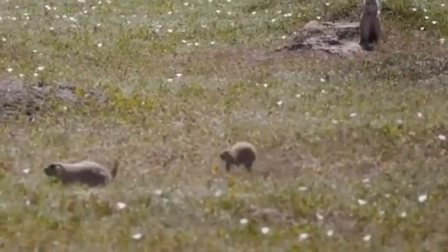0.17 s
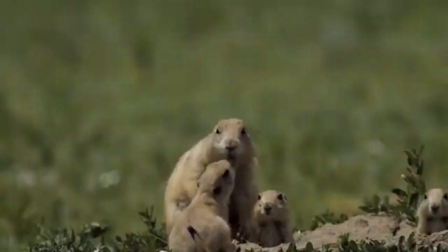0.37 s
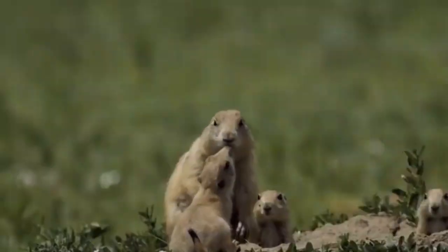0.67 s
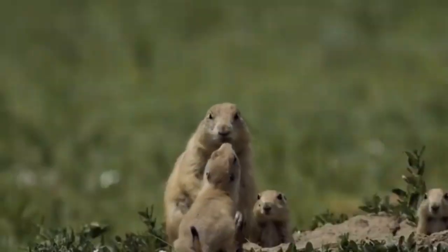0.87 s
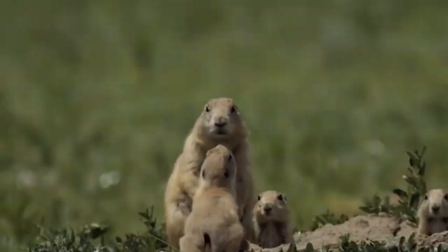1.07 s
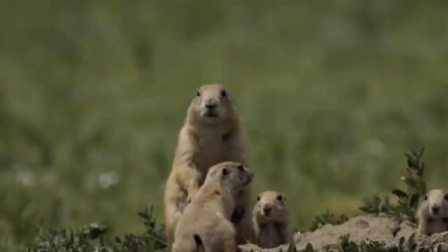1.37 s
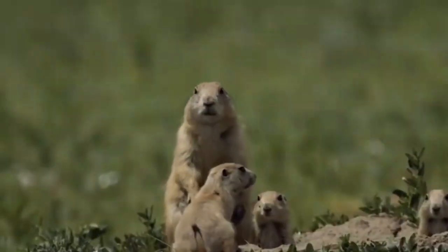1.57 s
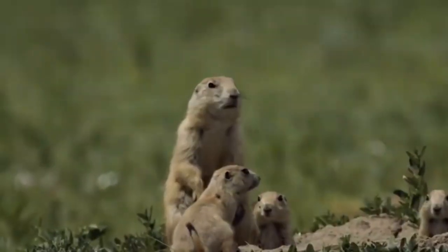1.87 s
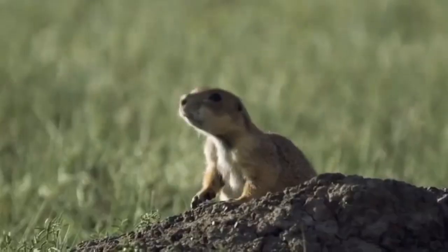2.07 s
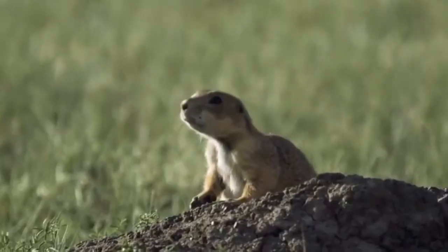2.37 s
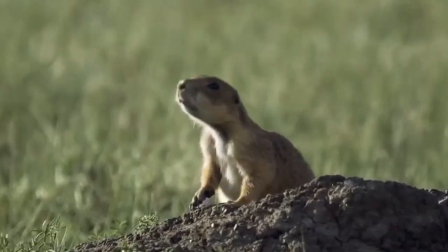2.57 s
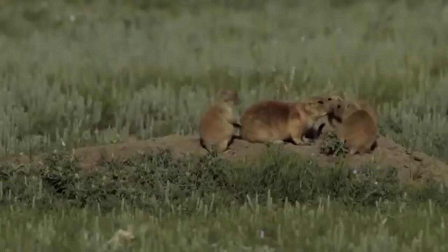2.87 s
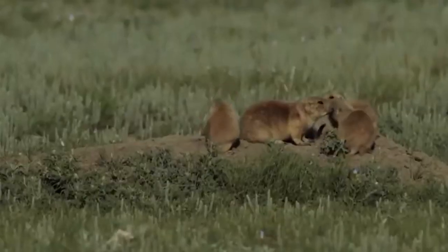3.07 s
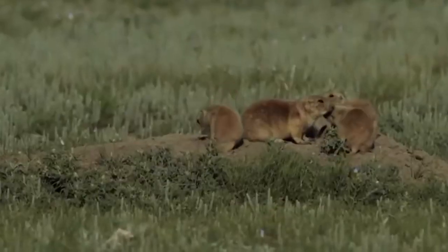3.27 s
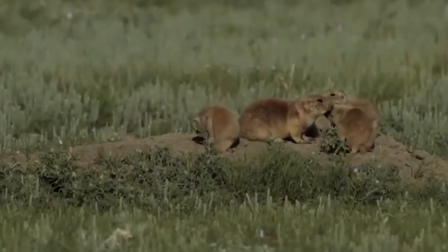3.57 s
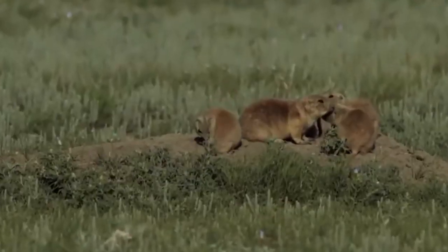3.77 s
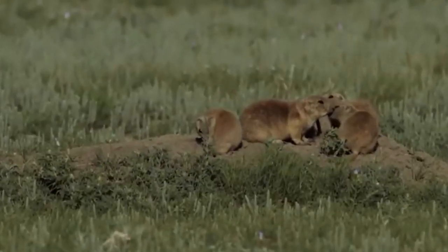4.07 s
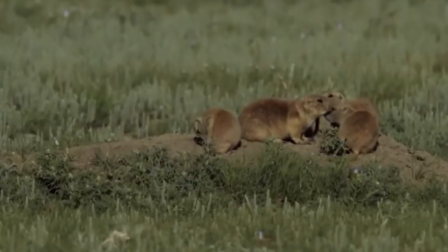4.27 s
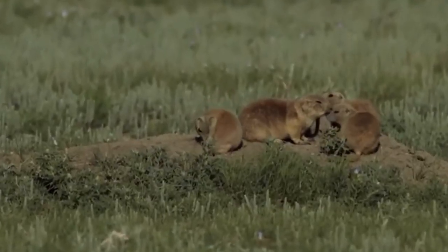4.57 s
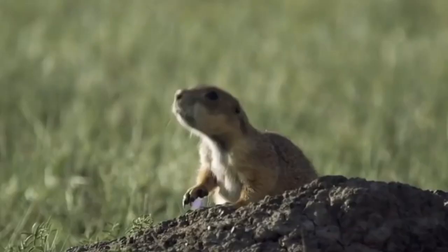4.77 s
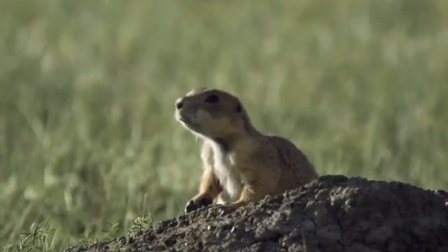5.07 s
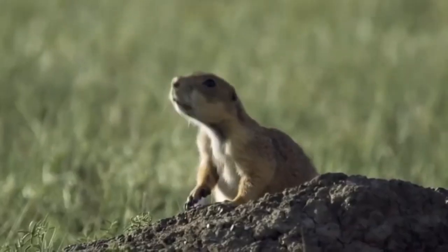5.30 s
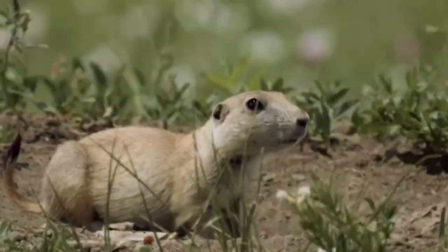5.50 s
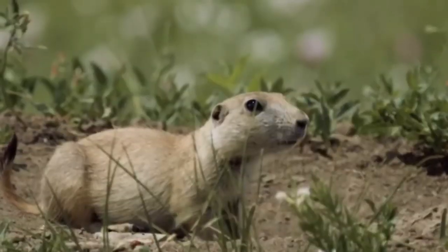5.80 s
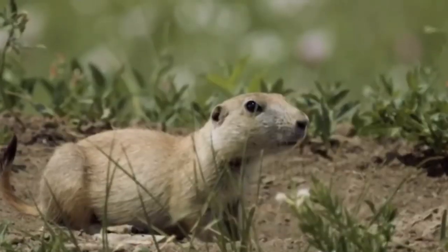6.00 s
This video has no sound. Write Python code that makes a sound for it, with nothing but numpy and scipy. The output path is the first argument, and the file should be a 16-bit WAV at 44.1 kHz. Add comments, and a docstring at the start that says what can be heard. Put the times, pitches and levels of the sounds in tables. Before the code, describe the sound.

Quiet open-air noise, a soft low rumble with even hiss, runs throughout; a faint hum lies under it until about 0.6 s. At 0.5 s comes the barely heard, echoing trace of a bark. Close, sharp prairie dog barks then strike at 0.7, 1.05, 1.8, 2.1 and 2.45 s: tiny bursts of high, piercing harmonic tone, snapping open, roughened by throat flutter and closed by a soft cluck, with brief scattered echoes. A hollow click falls near 1.5 s, with faint breathy wheezes around 1.45, 2.75 and 3.05 s. Weaker, extremely clipped barks come at 3.1 and 3.35 s. After a pause with small clucks and ticks, fuller barks return at 4.15, 4.5, 4.85 and 5.2 s, slightly softer than the first run. Clucks continue between them, and two fainter barks end it at 5.65 and 6.0 s.

```python
"""Outdoors, close to the microphone, prairie dogs call: first the faint, echoing tail of a bark,
then a series of short, sharp barks. Each bark snaps open into a high harmonic tone that a slower
flutter of the throat roughens; a soft cluck follows as the mouth shuts, and scattered echoes ring on.
Faint wheezes of filtered noise and further clucks and ticks come between the barks.
Low air noise lies under it all, with a faint hum at the start."""
import sys
import numpy as np
from scipy import signal
from scipy.fft import rfft, irfft
from scipy.io import wavfile

SR = 44100
rng = np.random.default_rng(int(sys.argv[2]) if len(sys.argv) > 2 else 0)


def persist_wave(psi):
    """Save psi, clipped to +-1, as 16-bit WAV."""
    counts = np.round(np.clip(psi, -1, 1) * 32767).astype(np.int16)
    wavfile.write(sys.argv[1], SR, np.atleast_2d(counts).T)


N = 270774  # length of the scene, samples
LEAD_SAMPLES = SR // 50  # room ahead of a bark's snap or a cluck's peak


def amp(db):
    """Turns dB into an amplitude factor."""
    return 10 ** (np.asarray(db) / 20)


def evened(x):
    """Scales to rms 1."""
    return x / np.sqrt(np.mean(x ** 2) + 1e-20)


def read(points, hz):
    """Joins (Hz, value) points on a log-frequency axis."""
    f, value = np.transpose(points)
    return np.interp(np.log(hz + 1), np.log(f + 1), value)


def add(mix, s, sound):
    """Mixes a sound in at time s."""
    part = mix[round(s * SR):][:len(sound)]
    part += sound[:len(part)]


def resonate(x, hz, width):
    """A two-pole resonance applied twice, for steep flanks."""
    b, a = signal.iirpeak(hz, hz / width, SR)
    once = signal.lfilter(b, a, x)
    return signal.lfilter(b, a, once)


def colour(x, points, size=2048):
    """Causal minimum-phase filter with the given spectrum."""
    hz = abs(np.fft.fftfreq(size, 1 / SR))
    log_gain = np.log(amp(read(points, hz)))
    taps = np.fft.ifft(np.exp(np.conj(signal.hilbert(log_gain)))).real
    return signal.fftconvolve(x, taps[:size // 2])[:len(x)]


def wander(count, hz):
    """Smooth random drift of rms 1, its spectrum fading out around hz."""
    f = np.fft.rfftfreq(count, 1 / SR)
    return evened(irfft(rfft(rng.standard_normal(count)) * np.exp(-(f / hz) ** 2), count))


def air(level_db=-56, flicker_db=1.66, rumble_hz=900):
    """Distant low rumble that wavers slightly, under an even hiss."""
    # spectrum of the air noise: (frequency [Hz], relative level per Hz [dB])
    air_spectrum = [(20, -70), (45, -37), (90, -38.5), (108, -40), (125, -7.5), (190, -6), (270, -2),
                    (470, -4.5), (660, -8.5), (1700, -17), (4000, -16), (13600, -21), (15500, -25.5)]
    hz = np.fft.rfftfreq(N, 1 / SR)
    noise = evened(irfft(rfft(rng.standard_normal(N)) * amp(read(air_spectrum, hz)), N))
    rumble = irfft(rfft(noise) / (1 + (hz / rumble_hz) ** 2), N)
    hiss = noise - rumble
    return amp(level_db) * (hiss + rumble * amp(flicker_db * wander(N, 31)))


def hum(hz=123.0, db=-67.5, end=0.61):
    """A faint far hum of two unsteady harmonics that fades out by its end time."""
    t = np.arange(N) / SR
    phase = 2 * np.pi * np.cumsum(hz * (1 + 0.017 * wander(N, 5.5))) / SR
    tone = evened(np.sin(phase) + 1.3 * np.sin(2 * phase))
    fade = np.clip((end - t) / 0.049, 0, 1)
    return amp(db) * tone * fade


def surroundings(x, delay=0.0037, build=0.0013):
    """Scattered echoes that build up after a short gap, each band dying at its own speed."""
    # decay time: (frequency [Hz], t60 [s])
    ring = [(500, 0.16), (1400, 0.38), (2900, 0.41), (4000, 0.43), (6500, 0.33), (12000, 0.13)]
    # tone of the echoes: (frequency [Hz], relative level [dB])
    echo_colour = [(500, -14.5), (1400, -4), (2900, 2.5), (4000, -5.5), (6500, -6), (12000, 5)]
    taps = rng.standard_normal(SR) * (rng.random(SR) < .15)  # sparse reflections
    hz, t, z = signal.stft(taps, SR, nperseg=256)
    band_db = read(echo_colour, hz)[:, None] - 60 * t / read(ring, hz)[:, None]
    tail = signal.istft(z * amp(band_db), SR, nperseg=256)[1]
    since = np.maximum(np.arange(len(tail)) / SR - delay, 0)
    tail *= 1 - np.exp(-since / build)
    wet = signal.fftconvolve(x, tail)
    return wet * np.linalg.norm(x) / np.linalg.norm(wet)  # as much energy as the dry sound


def wheeze(length, db, hz):
    """A swell of air noise through the throat resonances."""
    # resonances: (factor on the wheeze's pitch, width of one filter pass [Hz], level [dB])
    wheeze_modes = [(.345, 500, -6.5), (.78, 580, -4.5), (1.0, 448, 2.5), (1.72, 2560, -1.5)]
    noise = rng.standard_normal(int(length * SR))
    voiced = sum(amp(level) * evened(resonate(noise, hz * factor, width))
                 for factor, width, level in wheeze_modes)
    return amp(db) * evened(voiced * signal.windows.tukey(len(noise), .9))


def cluck(db, hz, length, tick_db, fall=0.1622, tick_s=0.0024, rough=0.4):
    """A tick as the mouth moves, then a few rough, falling cycles of its cavity; centred on the cavity's peak."""
    # tone of the tick: (frequency [Hz], gain [dB])
    tick_tone = [(60, -35.5), (400, -10.5), (1400, -6), (2200, 3.5), (3050, 8.5), (4500, -8.5),
                 (6300, -6.5), (9000, -31)]
    t = np.arange(-LEAD_SAMPLES, LEAD_SAMPLES) / SR
    pitch = hz * (1 - fall * np.tanh(t / length)) * (1 + 0.13 * wander(len(t), 580))
    turns = np.cumsum(pitch) / SR
    puff = evened(resonate(rng.standard_normal(len(t)), hz, 0.67 * hz))
    cavity = (np.sin(2 * np.pi * turns) + rough * puff) / np.cosh(0.99 * t / length)
    since = t + length / 2  # the tick leads the cavity's peak
    tick = rng.standard_normal(len(t)) * (since > 0) * np.exp(-abs(since) / tick_s)
    return amp(db) * cavity + amp(tick_db) * colour(tick, tick_tone)


def bark(length, pitch_hz, level_db, flutter, mouth, top_hz, jitter=0.017, swing=0.54, throb=0.18,
         breath=0.56, lead_db=-19.0, release=0.0085, rasp_db=-3.0, snap_db=16.0, thrum=0.8, hiss=0.89):
    """The folds snap open and buzz, a slower flutter beats against them, and the throat's resonances shape it."""
    # course of every bark: (time [share of its length], pitch [factor], effort [dB],
    # flutter depth [factor], flutter rate [factor])
    arch = [(0, 1.0, 2, .55, 0.86), (.28, 0.98, 4.5, .67, .97), (.7, 1.005, 2, 1, 1.07),
            (1, .998, 5.5, 1.08, 1.06), (1.3, 0.98, -1.5, 1.22, 1.1)]
    # throat and mouth: (resonance [Hz], width of one filter pass [Hz], gain [dB],
    # gain per unit of mouth closing [dB])
    throat = [(1400, 630, 9, 0), (2991, 460, 21, 8), (3952, 493, 23, -5), (6000, 1090, 12.5, 1.5)]
    # broad rasp between and above the resonances: (frequency [Hz], relative level [dB])
    rasp_tone = [(40, -22.5), (140, -17), (300, -4.5), (750, -7.5), (1650, 5), (2200, -14), (3400, 6),
                 (5000, -4.5), (5700, 5), (7700, 5.5), (8500, -21), (9500, -2), (12500, -7), (15000, -6.5)]
    # click as the folds snap open: (frequency [Hz], relative level [dB])
    snap_tone = [(100, -18), (700, -22), (1300, 25), (2100, -26), (3000, 1.5), (4000, -33), (4800, 7),
                 (6500, 16), (8500, -10.5), (15000, -19)]
    flutter_per_cycle = .207  # about one flutter in five cycles of the folds
    clear_grit = 0.37  # hoarseness of a bark with no flutter
    soft_start_s = 0.0069  # time constant of the soft start

    t = np.arange(-LEAD_SAMPLES, SR // 14) / SR
    course = np.transpose(arch)
    bend, effort_db, grip, haste = (np.interp(t / length, course[0], c) for c in course[1:])
    grit = clear_grit + flutter

    beat_hz = flutter_per_cycle * pitch_hz * haste * (1 + .02 * wander(len(t), 150))
    beat_phase = 2 * np.pi * np.cumsum(beat_hz) / SR
    beat = flutter * grip * (np.sin(beat_phase) + 0.71 * np.cos(2 * beat_phase))
    voice_hz = pitch_hz * bend * (1 + jitter * grit * wander(len(t), 600))
    phase = 2 * np.pi * np.cumsum(voice_hz) / SR + swing * beat
    # each flutter cycle shuts the folds harder, so the high harmonics throb most
    folds = evened(sum(np.cos(k * phase) * np.exp(throb * min(k, 5) * beat) for k in range(1, 12)))
    # air hisses through at each opening of the folds
    gusts = (1 + 0.6 * np.cos(phase)) * (1 + beat)
    drive = folds + breath * grit * gusts * rng.standard_normal(len(t))

    # the sound starts softly, jumps to full strength at the snap, and lets go
    fade = np.exp(-np.maximum(t - length + 0.003, 0) / release)
    soft_start = amp(lead_db) * np.exp(-abs(t) / soft_start_s)
    envelope = amp(effort_db) * np.where(t < -.0003, soft_start, fade)
    held = (t > 0) & (t < length)
    envelope = envelope / np.mean(envelope[held])

    closing = mouth + np.clip(t / length, 0, 1) - .5
    out = amp(snap_db) * colour(1. * (t == 0), snap_tone)
    for hz, width, db, lean_db in throat:
        out += resonate(drive * envelope, hz, width) * amp(db + lean_db * closing)
    # the rasp carries the buzz, the flutter's own low thrum and a steady hiss past the teeth
    teeth = hiss * grit * rng.standard_normal(len(t))
    rasp = colour((drive + thrum * beat + teeth) * envelope, rasp_tone)
    rasp = signal.sosfilt(signal.butter(6, top_hz, fs=SR, output="sos"), rasp)
    return amp(level_db) * (out + amp(rasp_db) * rasp / np.std(rasp[held]))


def scene(cluck_echo_db=-12.5, wheeze_echo_db=-9.0):
    """Barks, clucks and wheezes, each with its echo, over the background."""
    # faint breathy wheezes: (start [s], length [s], level [dB], strongest resonance [Hz])
    wheeze_list = [(1.43, 0.079, -50.5, 3870), (2.732, 0.066, -51.5, 3880), (3.047, 0.081, -45.5, 3090)]
    # clucks and ticks between the barks: (time of the peak [s], cavity level [dB], pitch at the peak [Hz],
    # decay length [s], tick level before its tone filter [dB])
    cluck_list = [(1.18, -45.5, 824, 0.0049, -62), (1.512, -28, 1045, .001, -30.5),
                  (1.538, -36, 823, .0036, -56), (2.342, -43.5, 1000, 0.000994, -58),
                  (3.62, -45, 1064, 0.0014, -47), (4.0974, -52, 1150, 0.0034, -28),
                  (4.234, -41, 1080, 0.0066, -44), (4.635, -46, 1100, 0.01, -41),
                  (4.962, -39, 708, 0.0087, -51), (4.971, -34.5, 1117, 0.001, -51),
                  (5.742, -33.5, 1022, 0.005, -50)]
    # barks: (time of the snap [s], length [s], pitch [Hz], relative level [dB], flutter depth [0-1],
    # mouth [-1 wide to 1 narrow], top of the rasp [Hz])
    bark_list = [(.521, 0.028, 1327, -58.5, 0.4, -0.025, 8750),
                 (.711, 0.025, 1313, -21, 0.24, -0.29, 15100),
                 (1.051, 0.017, 1283, -22, 0.11, -0.45, 15100),
                 (1.8093, 0.034, 1361, -21.5, 0.47, 0.061, 13400),
                 (2.1224, 0.022, 1358, -20.5, 0.41, 0.065, 13500),
                 (2.4432, 0.022, 1338, -22.5, 0.41, -0.13, 13900),
                 (3.093, 0.0065, 1455, -28, 0.65, 0.07, 14030),
                 (3.3574, 0.006, 1285, -25, 0.19, -0.27, 7700),
                 (4.1309, .023, 1397, -26, 0.32, 0.0078, 12100),
                 (4.5221, .031, 1400, -23.5, 0.52, 0.007, 12400),
                 (4.8481, 0.029, 1378, -25, 0.58, -0.14, 12400),
                 (5.1749, 0.025, 1383, -24.5, 0.47, -0.13, 12700),
                 (5.6443, 0.015, 1341, -30, 0.41, 0.096, 12200),
                 (5.9885, 0.017, 1432, -29, 0.21, 0.12, 12300)]
    # echo of a loud bark; a fainter one gains echo by this share of what it lacks in level
    loud_db, loud_echo_db, echo_growth = -20, -16, 0.41
    # cluck of the mouth after every bark, levels relative to the bark
    shut_after_s, shut_db, shut_hz, shut_s, shut_tick_db = 0.014, -17, 1000, 0.0026, -7.5

    mix = air() + hum()
    clucks, wheezes = np.zeros((2, N))
    lead_in = LEAD_SAMPLES / SR
    for s, *shape in wheeze_list:
        add(wheezes, s, wheeze(*shape))
    for s, *shape in cluck_list:
        add(clucks, s - lead_in, cluck(*shape))
    for s, length, pitch_hz, level_db, flutter, mouth, top_hz in bark_list:
        call = bark(length, pitch_hz, level_db, flutter, mouth, top_hz)
        echo_db = loud_echo_db + echo_growth * (loud_db - level_db)
        add(mix, s - lead_in, call)
        add(mix, s - lead_in, amp(echo_db) * surroundings(call))
        shut = cluck(level_db + shut_db, shut_hz, shut_s, level_db + shut_tick_db)
        add(clucks, s + length + shut_after_s - lead_in, shut)
    mix += clucks + amp(cluck_echo_db) * surroundings(clucks)[:N]
    mix += wheezes + amp(wheeze_echo_db) * surroundings(wheezes)[:N]
    return mix[None]


def record(dry, threshold_db=-22.5, squeeze=0.59, sensing=0.0021, attack=0.0019, edge_hz=15700):
    """A fast compressor lets the first spike of each loud bark by and reins in the rest; then the band limit."""
    def follow(x, seconds):
        """Smooths with a one-pole lag."""
        r = np.exp(-1 / (seconds * SR))
        return signal.lfilter([1 - r], [1, -r], x)
    level_db = 10 * np.log10(follow(dry[0] ** 2, sensing) + 1e-12)
    cut_db = follow(squeeze * np.maximum(level_db - threshold_db, 0), attack)
    held = np.clip(dry * amp(-cut_db), -.85, .85)
    low_pass = signal.firwin(255, edge_hz, window=("kaiser", 9), fs=SR)
    return signal.oaconvolve(held, low_pass[None], "same")


dry = scene()
out = record(dry)
persist_wave(out)
```